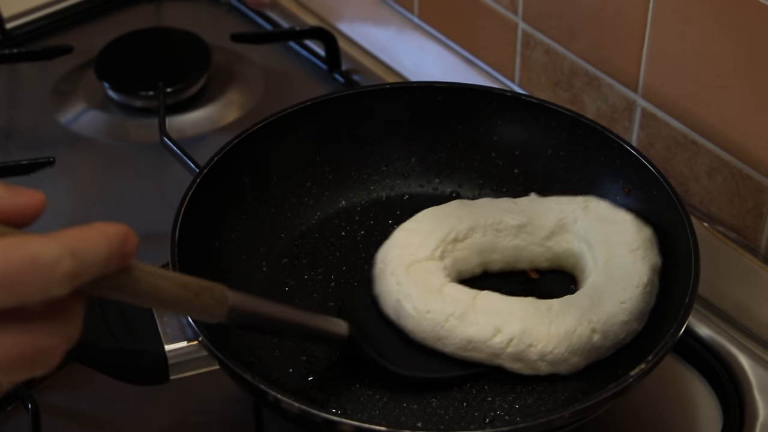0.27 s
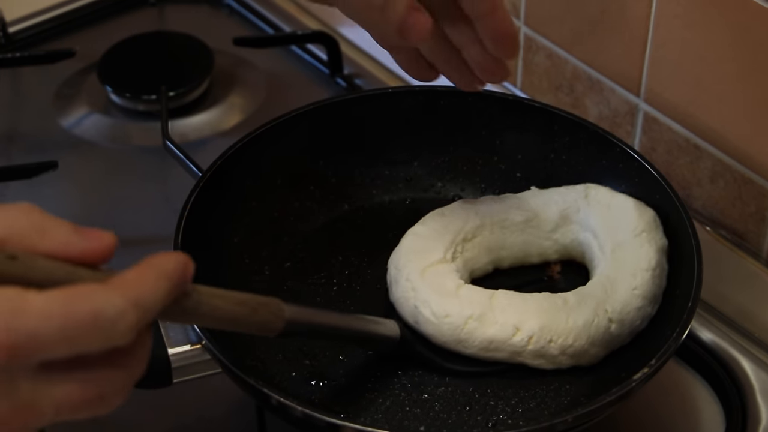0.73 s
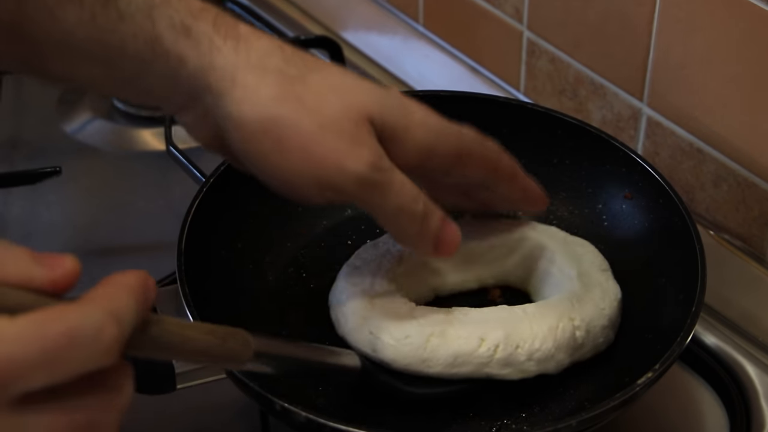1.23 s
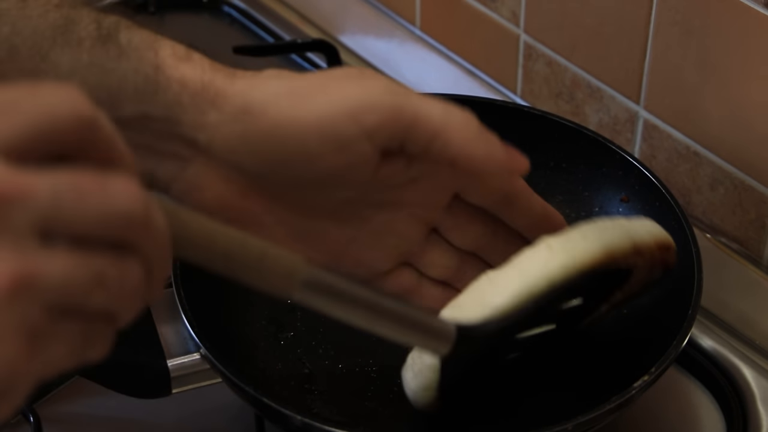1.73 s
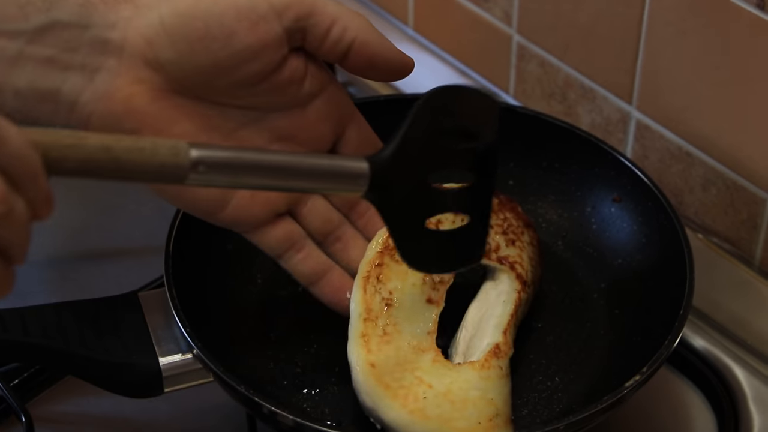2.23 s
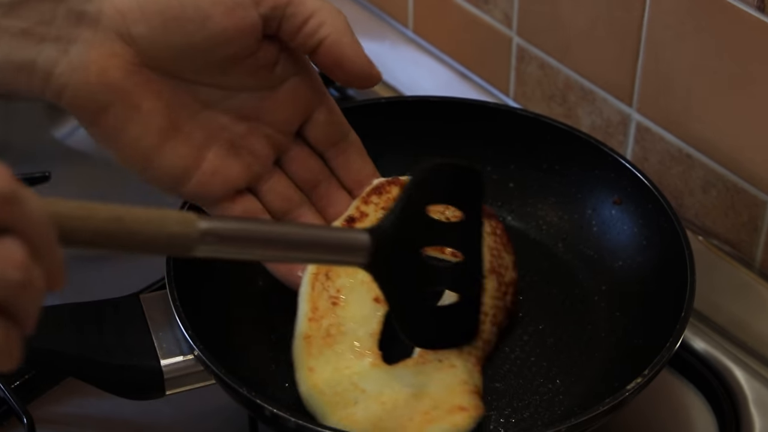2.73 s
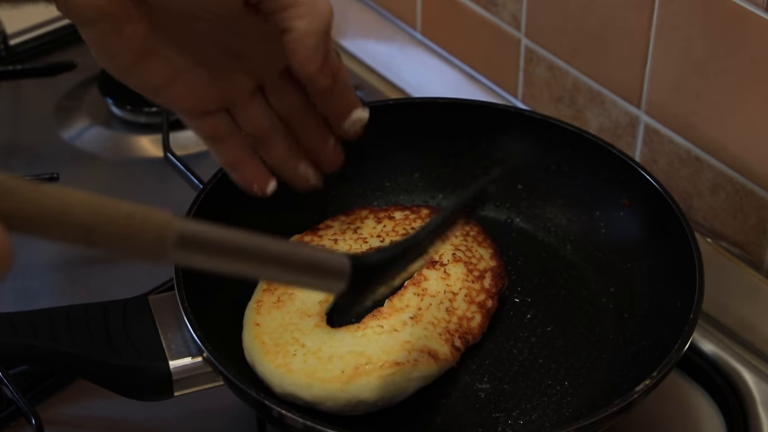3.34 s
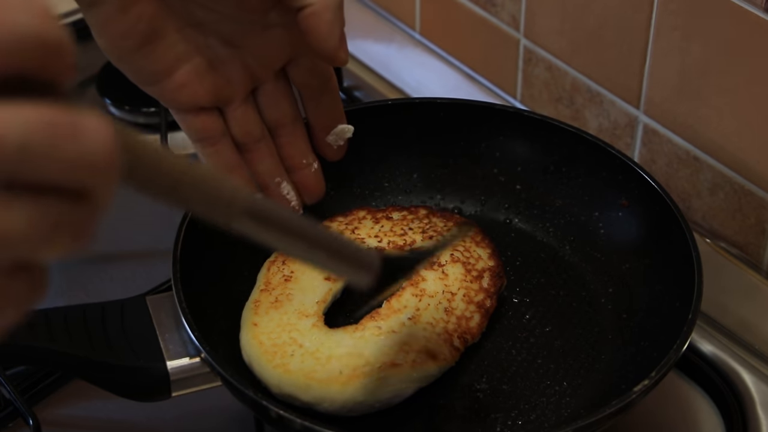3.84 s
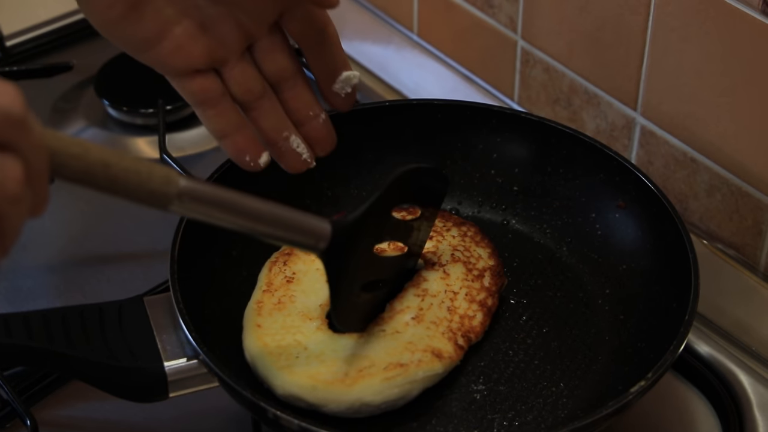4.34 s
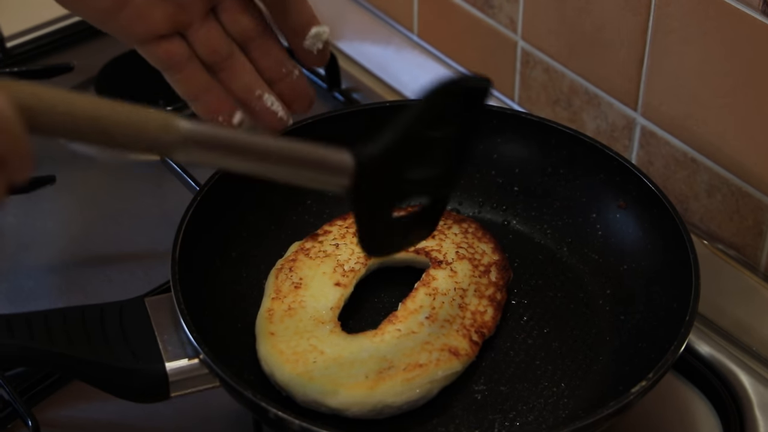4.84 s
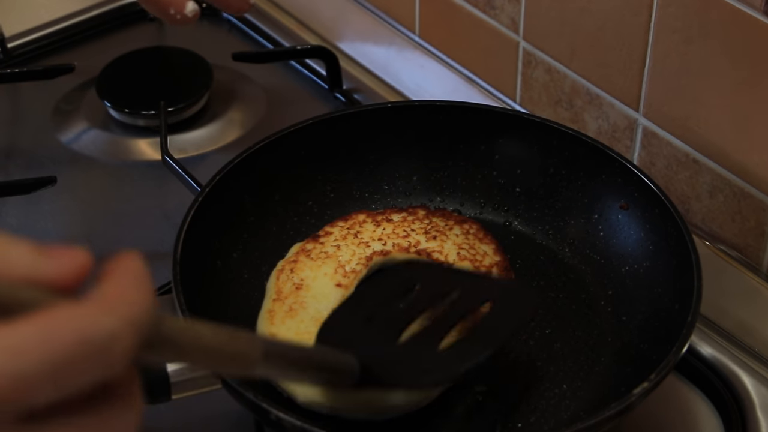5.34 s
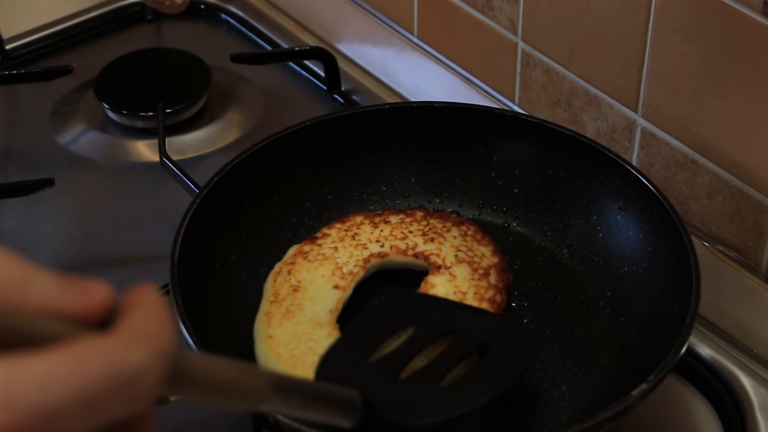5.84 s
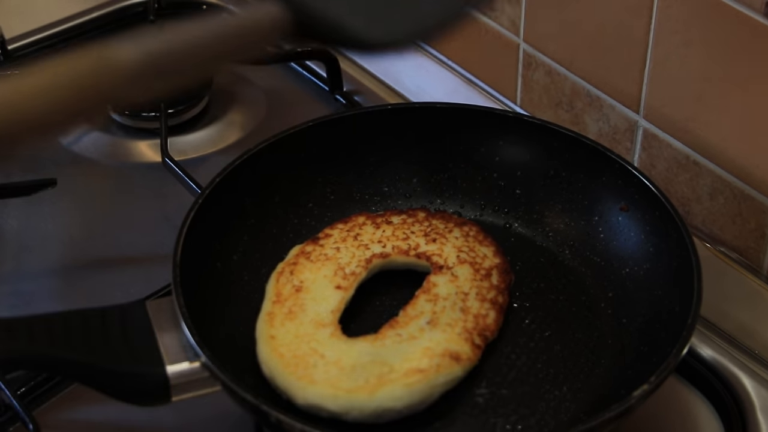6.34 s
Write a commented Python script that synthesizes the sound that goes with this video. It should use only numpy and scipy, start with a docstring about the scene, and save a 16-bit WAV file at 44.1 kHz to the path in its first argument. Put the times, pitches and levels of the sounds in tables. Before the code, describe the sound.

Dough fries quietly in a pan, a plastic spatula scrapes and flips it, then a dense, crackling oil sizzle swells and slowly eases.

```python
"""A small kitchen, microphone close to a nonstick pan on a gas stove, where a ring of dough fries.
Oil drops burst while a plastic spatula shoves under the dough, sticks and slips on the coating,
ticks against the pan and flips the ring. The raw side lands in the hot oil: a dense sizzle of
bursting steam bubbles swells, rings the pan's low modes and thin upper tones, then slowly eases.
The flame rumbles underneath; the tiles and the room answer faintly."""
import sys
import numpy as np
from scipy import signal
from scipy.fft import rfft, irfft, next_fast_len
from scipy.io import wavfile
from scipy.ndimage import uniform_filter1d, map_coordinates

SR = 44100
rng = np.random.default_rng(int(sys.argv[2]) if len(sys.argv) > 2 else 0)


def dump(signal):
    """Clip the signal to [-1, 1] and save it as 16-bit WAV at the path in sys.argv[1]."""
    limited = np.clip(np.atleast_2d(signal).T, -1, 1)
    pcm = np.round(limited * 32767).astype(np.int16)
    wavfile.write(sys.argv[1], SR, pcm)


N = 290619
LANDING_S, WETTING_S = 1.94, 0.015  # the raw side meets the oil; time until it is wetted

# the pan's resonances: (frequency [Hz], width [Hz], lift at ring=1 [dB])
PAN_MODES = [(550, 100, 9.5), (822, 148, 10.5), (1298, 25, 8), (1405, 70, 8.5), (2095, 46, 7.5),
             (2217, 45, 7.5), (2460, 55, 4.5), (3400, 150, 2)]
# the colour of each source: (frequency [Hz], relative level [dB])
FLAME_SPECTRUM = [(12, -16), (20, -15), (48, -0.5), (61, 3.5), (81, -4), (103, -5), (167, -8.5), (215, -3),
                  (245, -11), (344, 0.5), (458, -12), (506, 0), (543, -5), (600, -2.5), (780, -28),
                  (1320, -120)]
SIMMER_SPECTRUM = [(200, 3.5), (500, -5), (680, -1.5), (900, 7), (1500, 4.5), (2000, 3), (2700, -0.5),
                   (6000, 2), (8500, -3.5), (11000, 1), (16000, -4)]
FIZZ_SPECTRUM = [(1500, -47), (3500, -6), (5000, 6), (6300, 9), (8500, -4.5), (11500, 3), (16000, -8)]
DRAG_SPECTRUM = [(60, -39), (200, -9), (450, -12), (680, -6), (900, 2.5), (1550, 3.5), (1950, -4),
                 (2300, -13), (3000, -8.5), (8000, -47)]
RASP_SPECTRUM = [(800, -38), (1600, -12.5), (2300, 0), (3300, -2), (4600, -4), (6500, -12), (8500, -13.5),
                 (12000, -24), (16000, -39)]
TICK_SPECTRUM = [(200, -33), (800, -3), (1700, 3), (3500, -4), (5500, 3), (8000, -9), (11000, 1.5),
                 (16000, -23)]
BUBBLING_SPECTRUM = [(150, -32.5), (350, -16.5), (680, -8.5), (950, 2.5), (1150, -0.5), (1500, 3),
                     (1900, 4), (2300, 1.5), (2800, -19), (5000, -25.5)]
SIZZLE_SPECTRUM = [(1200, -26), (2400, -5), (3000, -1), (4200, -2.5), (5200, 2), (7000, 0), (8500, -3.5),
                   (11000, -18.5), (16000, -6)]
MIST_SPECTRUM = [(5000, -35.5), (8000, -7.5), (10000, 2), (12000, 3), (14000, 0.5), (16000, -3.5)]
# kitchen hum: (frequency [Hz], rms level [dB])
HUM_TONES = [(53, -74), (100, -55.5), (192, -66.5)]
# soft knocks of pan and handle on the stove: (time [s], level [dB], pitch [Hz], half length [s])
PAN_BUMPS = [(0.363, -33.5, 221, 0.024), (.7, -45, 92, 0.39), (1.45, -46, 160, 0.23),
             (1.66, -39, 220, 0.02), (1.957, -35, 116, 0.031), (3.352, -37, 45, 0.048),
             (3.47, -46, 55, 0.056)]
# the browned side fries until it is lifted off: (time [s], level [dB])
BROWNED_LEVEL = [(0, -35), (.28, -37.5), (.55, -32.5), (1, -35.5), (1.33, -34), (1.8, -41), (2, -35),
                 (2.5, -59)]
# wet dough squeezed onto hot metal: (time [s], length [s], level [dB])
DOUGH_SPURTS = [(.362, 0.013, -31), (.43, 0.074, -30.5), (.627, 0.026, -28.5), (.725, 0.028, -26.5),
                (.775, 0.079, -39), (.89, 0.023, -27), (1.125, 0.009, -32.5)]
# pushes under the dough, from 1.5 s up the wall to turn it: (time [s], length [s], drag [dB], rasp [dB])
SPATULA_STROKES = [(0, 0.028, -42, -37), (.355, 0.047, -31.5, -33.5), (.421, 0.0039, -30, -24),
                   (.45, 0.049, -21.5, -23), (.626, 0.028, -22, -26.5), (.657, 0.021, -26.5, -30),
                   (.74, .008, -29.5, -35), (.925, 0.019, -29.5, -38), (1.085, 0.058, -35, -58),
                   (1.52, 0.13, -35.5, -56), (1.625, 0.15, -26, -41.5), (1.719, 0.011, -31, -34.5),
                   (1.79, 0.06, -30.5, -50), (1.857, 0.088, -26.5, -31.5), (5.78, 0.03, -45, -31)]
# the loudest bursting oil drops: (time [s], snap level [dB], pitch [Hz], spray level [dB])
OIL_POPS = [(0.0786, -33, 6400, -31.5), (0.134, -24, 8300, -23.5), (0.1658, -17, 6860, -31.5),
            (0.2468, -15, 9200, -21), (0.75, -16, 6760, -26), (0.9369, -10, 6160, -39),
            (1.0535, -3.5, 7140, -23.5), (1.1509, -22, 7740, -28.5), (1.1937, -20, 8500, -24.5),
            (1.246, -14, 6100, -27), (1.4954, -11, 8500, -24), (1.5329, -21, 8200, -27),
            (1.672, -18, 11000, -27.5), (2.1365, -4, 12900, -18.5), (2.402, -10, 8700, -25),
            (3.048, -16, 10100, -20), (3.329, -29, 6350, -22), (4.1212, -3.5, 6440, -23),
            (5.4467, -15, 10000, -21), (5.717, -10, 5400, -30), (5.8824, -0.5, 11800, -26),
            (6.208, -14, 6150, -22)]
# the blade flicks off the pan's wall: (time [s], pitch [Hz], peak level [dB], t60 [s])
PAN_RINGS = [(.42, 863, -18, 0.081), (.673, 805, -16.5, 0.097), (1.718, 2250, -27.5, 0.29),
             (1.721, 1385, -27, 0.21), (2.133, 1385, -27.5, 0.28), (5.8, 2200, -18.5, 0.055)]
# the blade's edge ticks on the pan: (time [s], peak level [dB])
BLADE_TICKS = [(.4203, -11), (1.2443, -13), (1.4858, -2), (5.803, -12)]
# how hard the raw side fries: (time [s], level [dB])
FRYING_LEVEL = [(1.99, -42.5), (2.2, -32), (2.45, -29.5), (2.62, -27), (2.73, -29), (2.93, -29),
                (3.05, -27), (3.27, -24.5), (3.37, -30.5), (3.5, -24.5), (4.1, -25.8), (4.35, -24),
                (5.05, -26), (5.15, -27.5), (5.48, -25), (5.7, -28), (6.0, -27.2), (6.54, -31)]
# trapped steam, relative to the frying: (time [s], boiling beneath [dB], bubbling at the edge [dB])
TRAPPED_STEAM = [(2.05, -6, 0), (2.2, -24, 0), (2.35, -6, 0.5), (2.92, -3, -6), (3.22, -7.5, -4.5),
                 (3.8, -12, -2), (4.5, -12, -6), (6.0, -10, -5.5), (6.55, -13.5, -3)]
# two low pan modes under a shifting load: (time [s], first's pitch [Hz], second's relative level [dB])
LOADED_MODES = [(2, 806, -6), (2.5, 797, 2), (2.9, 818, -4.5), (3.3, 807, -4), (3.7, 830, 1),
                (4.6, 840, -6.5), (6.5, 856, -11)]
# the pan's upper resonances: (middle [s], half length [s], pitch [Hz], width [Hz], level [dB])
PAN_TONES = [(2.547, 0.34, 2840, 70, -38), (2.55, 0.3, 4520, 180, -39.5), (3.337, 0.47, 6240, 770, -35.5),
             (5.2, 0.75, 5430, 130, -38.5), (5.497, 0.5, 7130, 200, -40), (5.95, 0.64, 2230, 300, -38.5),
             (5.8, 0.99, 3420, 690, -36)]
# the room's decay: (frequency [Hz], t60 [s])
ROOM_DECAY = [(200, 0.6), (2000, 0.13), (14000, 0.082)]


def amp(db):
    """Decibels to gain."""
    return 10 ** (np.asarray(db) / 20)


def unit(x):
    """Scaled to rms 1."""
    return x / np.sqrt(np.mean(x ** 2) + 1e-20)


def along(points, hz):
    """(Hz, value) points read on a log axis."""
    knots_hz, values = np.transpose(points)
    return np.interp(np.log(hz + 1), np.log(knots_hz + 1), values)


def curves(rows):
    """One value per sample for each column after the time."""
    times, *columns = np.transpose(rows)
    return np.array([np.interp(np.arange(N) / SR, times, column) for column in columns])


def swells(rows, rise_share, fall_s):
    """A gain per dB column: each row rises 20 dB in rise_share of its length, falls 20 dB in fall_s."""
    t = np.arange(N) / SR
    power = 0
    for s, length, *dbs in rows:
        before = np.maximum(s - t, 0) / (rise_share * length)
        after = np.maximum(t - s - length, 0) / fall_s
        shape = amp(np.clip(-20 * (before + after), -120, 0))
        power = power + np.outer(amp(dbs), shape) ** 2
    return np.sqrt(power)


def wobble(rate):
    """A smooth random curve, rate knots a second."""
    knots = rng.standard_normal(int(N * rate / SR) + 4)
    return unit(map_coordinates(knots, [np.arange(N) * rate / SR]))


def grains(rate, spread_db):
    """Random tiny impulses, rate a second, most small and a few large."""
    size = amp(spread_db * np.minimum(rng.standard_normal(N), 3))
    return unit((rng.random(N) < rate / SR) * size * np.sign(rng.standard_normal(N)))


def band_noise(centre_hz, slope_db, size):
    """Noise of rms 1 that falls by slope_db one octave from its centre."""
    octaves = np.log2((np.fft.rfftfreq(size, 1 / SR) + 1) / centre_hz)
    return unit(irfft(rfft(rng.standard_normal(size)) * amp(-slope_db * octaves ** 2), size))


def coloured(x, gain_db):
    """x through a causal filter whose gain in dB is a function of frequency."""
    size = 2 * next_fast_len(len(x) // 2 + 4096)
    gain = amp(gain_db(np.fft.rfftfreq(size, 1 / SR)))
    cepstrum = irfft(np.log(gain + 1e-6), size)
    cepstrum[1:size // 2] *= 2  # folded for minimum phase
    cepstrum[size // 2 + 1:] = 0
    return irfft(rfft(x, size) * np.exp(rfft(cepstrum)), size)[:len(x)]


def resonance(x, hz, width_hz):
    """x through one narrow resonance whose centre may move; rms 1."""
    turn = np.exp(2j * np.pi * np.cumsum(hz * np.ones(N)) / SR)
    lowpass = signal.butter(2, width_hz / 2, fs=SR)
    return unit((turn * signal.lfilter(*lowpass, x / turn)).real)


def through_pan(x, spectrum, ring=1):
    """An excitation with its own spectrum, radiated by the pan; rms 1. Dough on the spot lowers ring."""
    def ring_db(hz):
        return sum(db / (1 + (2 * (hz - centre) / width) ** 2) for centre, width, db in PAN_MODES)
    return unit(coloured(x, lambda hz: along(spectrum, hz) + ring * ring_db(hz)))


def add(track, s, sound):
    """Mix a sound into the track at time s."""
    start = max(round(s * SR), 0)
    track[start:start + len(sound)] += sound[:max(len(track) - start, 0)]


def stove():
    """The flame rumbles, the kitchen hums and the pan shifts on its support."""
    t = np.arange(N) / SR
    flame = amp(-44) * unit(coloured(rng.standard_normal(N), lambda hz: along(FLAME_SPECTRUM, hz)))
    hum = bumps = 0
    for hz, db in HUM_TONES:
        hum += amp(db) * np.sqrt(2) * np.sin(2 * np.pi * hz * t + 3 * wobble(2.76))
    for s, db, hz, half_length in PAN_BUMPS:
        swell = amp(db) * np.exp(-.5 * ((t - s) / half_length) ** 2)
        bumps += swell * band_noise(hz, slope_db=3.5, size=next_fast_len(N))[:N]
    return flame + hum + bumps


def simmer():
    """The browned side fries quietly and spurts when the dough is pushed."""
    level, = amp(curves(BROWNED_LEVEL))
    bubbles = grains(rate=6000, spread_db=4) * amp(.52 * wobble(38.3))
    spurts, = swells(DOUGH_SPURTS, rise_share=.78, fall_s=.023)
    fizz = grains(rate=5000, spread_db=5) * amp(3.3 * wobble(151.2))
    quiet = level * through_pan(bubbles, SIMMER_SPECTRUM, ring=.99)
    return quiet + spurts * through_pan(fizz, FIZZ_SPECTRUM)


def spatula():
    """The blade sticks and slips on the coating: a dull drag, and a rasp when pushed hard."""
    drag_gain, rasp_gain = swells(SPATULA_STROKES, rise_share=.43, fall_s=.037)
    slips = grains(rate=1900, spread_db=2.5) * amp(.5 * wobble(90))
    bite = grains(rate=5000, spread_db=2.5) * amp(1.5 * wobble(120))
    drag = drag_gain * through_pan(slips, DRAG_SPECTRUM, ring=1.13)
    rasp = rasp_gain * through_pan(bite, RASP_SPECTRUM, ring=1.1)
    return drag + rasp


def drop(hz, spray_share, spray_t60=.042):
    """One drop bursts: a snap of a few cycles with its peak 1 ms in, then a dying spray."""
    t = np.arange(2048) / SR - .001
    cycles = np.maximum(1 + t * hz, 0)
    snap = cycles ** 2 * np.exp(2 * (1 - cycles)) * np.cos(2 * np.pi * hz * t + rng.normal(0, .95))
    spray = band_noise(hz, slope_db=3.5, size=len(t)) * (t > 0) * amp(-60 * (t - .002) / spray_t60)
    return snap + spray_share * spray


def crackle(heat, count=260):
    """Small drops burst at random: faint from the start, then as strong as the frying around them."""
    out, strength = np.zeros(N), heat + amp(-28)
    for when, size, pitch in zip(rng.random(count), rng.random(count), rng.standard_normal(count)):
        hz = min(7000 * np.exp(.4 * pitch), 14000)
        gain = strength[int(when * N)] * amp(-5 + 4.7 * size ** 2)
        add(out, when * N / SR, gain * drop(hz, spray_share=.33, spray_t60=.032))
    return out


def pops():
    """Single oil drops burst close to the microphone, above the sizzle."""
    out = np.zeros(N)
    for s, db, hz, spray_db in OIL_POPS:
        add(out, s - .001, amp(db) * drop(hz, spray_share=amp(spray_db - db)))
    return out


def tiled_wall(x, delay_s=.00088, echo_db=-12):
    """The tiles just behind the pan throw back each snap."""
    return x + amp(echo_db) * np.pad(x, (round(delay_s * SR), 0))[:N]


def pan_rings():
    """A flick of the blade sets one mode of the pan ringing."""
    out, t = np.zeros(N), np.arange(SR // 3) / SR
    for s, hz, db, t60 in PAN_RINGS:
        add(out, s, amp(db - 60 * t / t60) * np.sin(2 * np.pi * hz * t))
    return out


def blade_ticks(rattle_t60=.072):
    """Plastic meets the coating: a hard, dry snap that the pan colours, then the blade rattles."""
    out, t = np.zeros(N), np.arange(4096) / SR
    for s, db in BLADE_TICKS:
        rattle = amp(-24 - 60 * t / rattle_t60) * rng.standard_normal(len(t))
        snap = through_pan((t == 0) + rattle, TICK_SPECTRUM, ring=.4)
        add(out, s, amp(db) * snap / np.abs(snap).max())
    return out


def frying():
    """Steam boils under the raw dough, bubbles at its edge and bursts in the open oil."""
    wetted = np.clip((np.arange(N) / SR - LANDING_S) / WETTING_S, 0, 1)
    heat = amp(curves(FRYING_LEVEL)[0]) * wetted * amp(.13 * wobble(12))
    boil_gain, edge_gain = heat * amp(curves(TRAPPED_STEAM))
    return boil_gain * boiling() + sizzle(heat, edge_gain) + crackle(heat) + spits(heat) + spatter()


def boiling():
    """Collapsing steam pockets drum on two low modes of the pan."""
    first_hz, second_db = curves(LOADED_MODES)
    knocks = grains(rate=2500, spread_db=8)
    first = resonance(knocks, first_hz, width_hz=86)
    return first + amp(second_db) * resonance(knocks, hz=1385, width_hz=62)


def sizzle(heat, edge_gain):
    """Bubbles burst in clusters at the dough's edge, and faster in the open oil with its fine mist."""
    surge = amp(.6 * wobble(55))
    flare = surge * amp(1.32 * wobble(220))
    bubbles = surge * grains(rate=2500, spread_db=3)
    bursts = flare * grains(rate=7000, spread_db=1)
    droplets = flare * amp(1.4 * wobble(130)) * grains(rate=12000, spread_db=3)
    edge = edge_gain * through_pan(bubbles, BUBBLING_SPECTRUM, ring=.87)
    oil = heat * through_pan(bursts, SIZZLE_SPECTRUM)
    mist = amp(-.07) * heat * through_pan(droplets, MIST_SPECTRUM)
    return shifting(edge + oil + mist, depth_db=.9)


def shifting(x, depth_db):
    """Bubbles come and go from place to place, so the colour drifts in patches."""
    spectra = signal.stft(x, nperseg=512)[2]
    patches = uniform_filter1d(rng.standard_normal(spectra.shape), size=6, axis=0)  # across frequency
    patches = uniform_filter1d(patches, size=30, axis=1)  # across time
    return signal.istft(spectra * amp(depth_db * unit(patches)), nperseg=512)[1][:N]


def spatter(count=22, volley_s=.9):
    """Surface water flashes off in a volley of sharp crackles just after the raw side lands."""
    out = np.zeros(N)
    for slot, (jitter, size, pitch) in enumerate(rng.random((count, 3))):
        progress = (slot + jitter) / count
        db = -17 - 3 * progress + 3 * (2 * size - 1.5)
        burst = drop(5000 + 7000 * pitch, spray_share=.3, spray_t60=.025)
        add(out, LANDING_S + volley_s * progress, amp(db) * burst)
    return out


def spits(heat, count=30, above_db=13.5):
    """Now and then a larger drop spits out of the sizzle."""
    out = np.zeros(N)
    for when, size, pitch in rng.random((count, 3)):
        gain = heat[int(when * N)] * amp(above_db + 5 * (size - .5))
        add(out, when * N / SR, gain * drop(6500 + 5500 * pitch, spray_share=.2, spray_t60=.022))
    return out


def pan_tones():
    """Thin, airy tones swell and fade as the frying excites the pan's upper resonances."""
    out, t = np.zeros(N), np.arange(N) / SR
    for s, half_length, hz, width_hz, db in PAN_TONES:
        swell = amp(db) * np.exp(-.5 * ((t - s) / half_length) ** 2)
        out += swell * resonance(rng.standard_normal(N), hz, width_hz)
    return out


def room_tail():
    """A fresh diffuse decay of energy 1, shorter in the treble."""
    hz, t, spectra = signal.stft(rng.standard_normal(SR // 4), SR, nperseg=256)
    decay = amp(-60 * t / along(ROOM_DECAY, hz)[:, None])
    tail = signal.istft(spectra * decay, SR, nperseg=256)[1]
    return tail / np.linalg.norm(tail)


def kitchen(x, tail_db=-13):
    """The small room answers with a faint, short, diffuse tail."""
    out, step = x.copy(), SR // 4
    for start in range(0, N, step):  # a new tail for each block, so no pitch stands out
        reverb = signal.fftconvolve(x[start:start + step], room_tail())
        add(out, start / SR + .003, amp(tail_db) * reverb)
    return out


def scene():
    """The pan sits dead centre, close up; only a faint room rumble differs between left and right."""
    pan = spatula() + pan_rings() + blade_ticks() + simmer() + frying() + pan_tones()
    pan += tiled_wall(pops())
    mid = kitchen(pan) + stove()
    side = amp(-63.5) * band_noise(192, slope_db=6, size=next_fast_len(N))[:N]
    return np.array([mid + side, mid - side])


def record(dry, top_hz=15900):
    """The microphone chain passes nothing above its band limit."""
    size = next_fast_len(N + 4096)
    passband = np.fft.rfftfreq(size, 1 / SR) < top_hz
    return irfft(rfft(dry, size) * passband, size)[:, :N]


dry = scene()
out = record(dry)
dump(out)
```